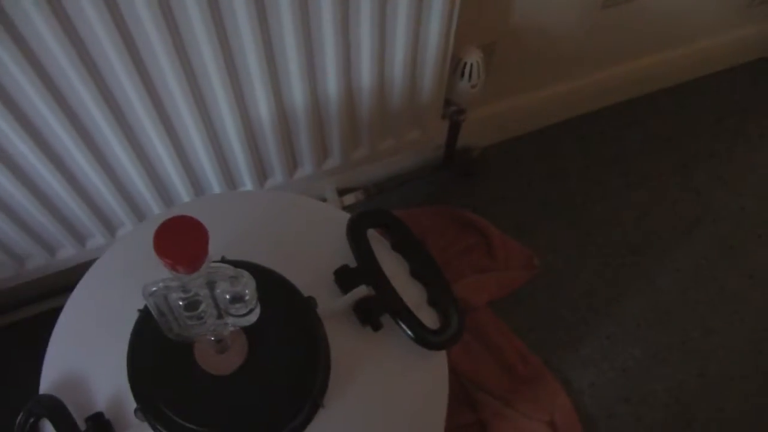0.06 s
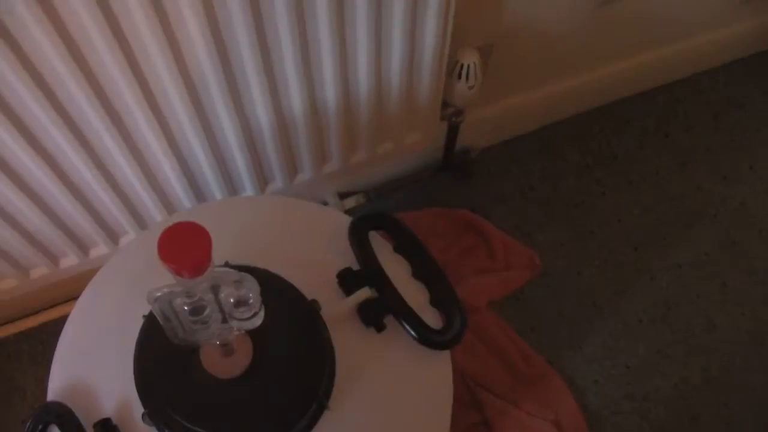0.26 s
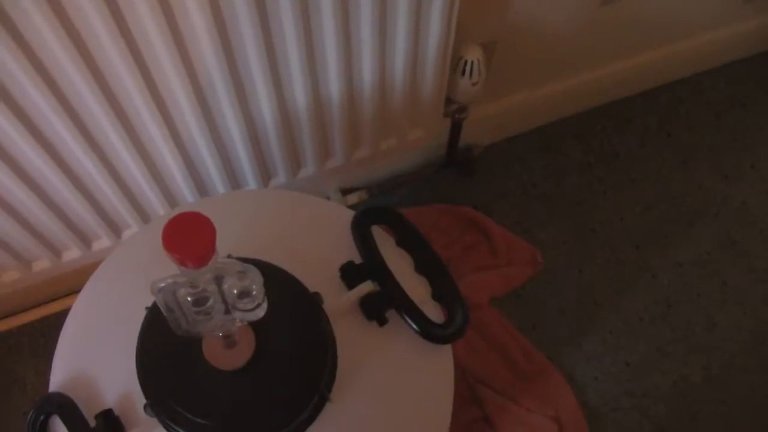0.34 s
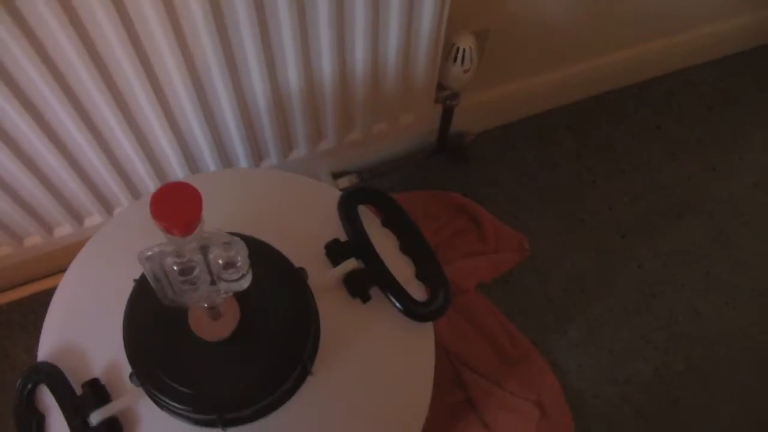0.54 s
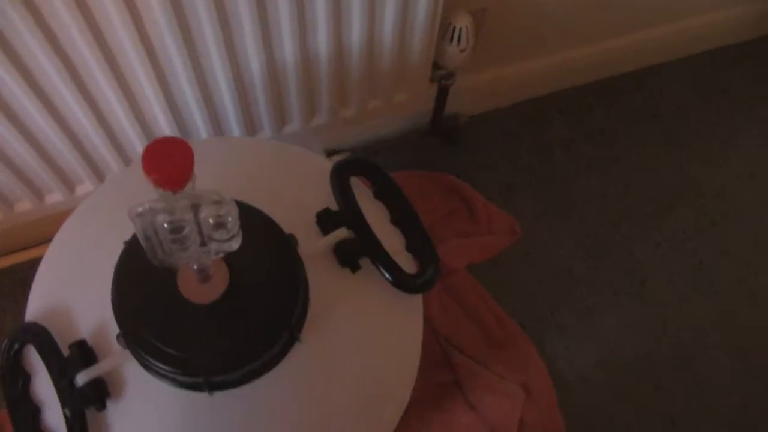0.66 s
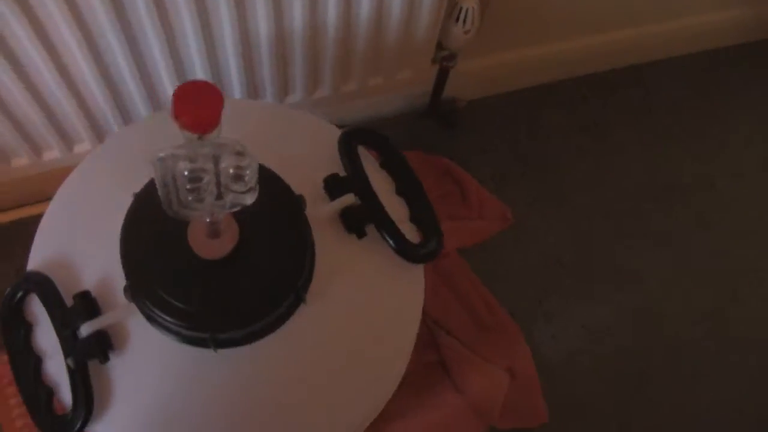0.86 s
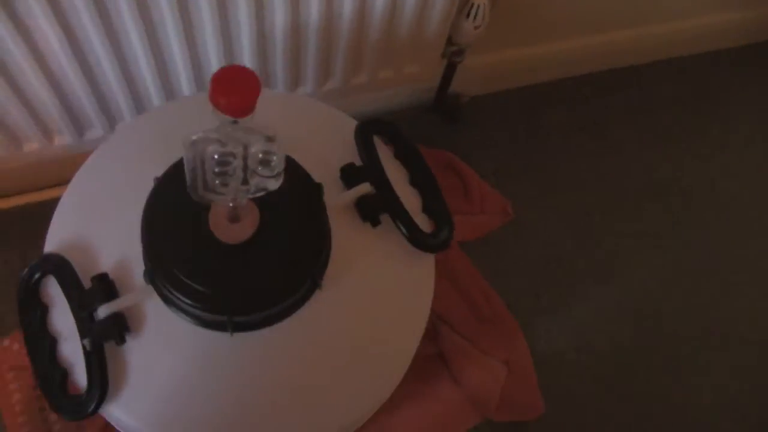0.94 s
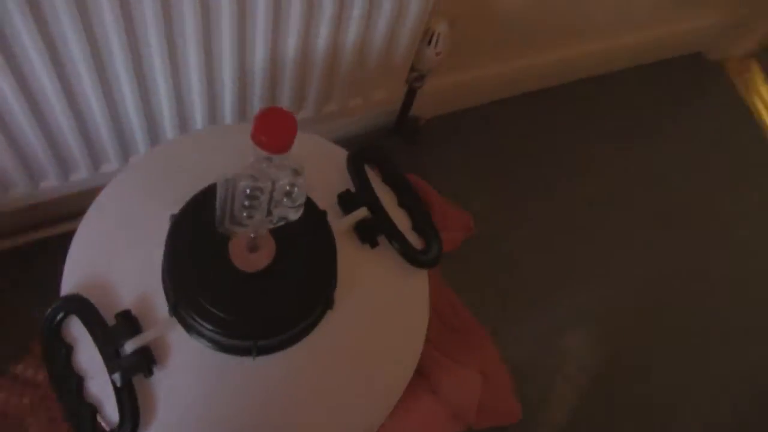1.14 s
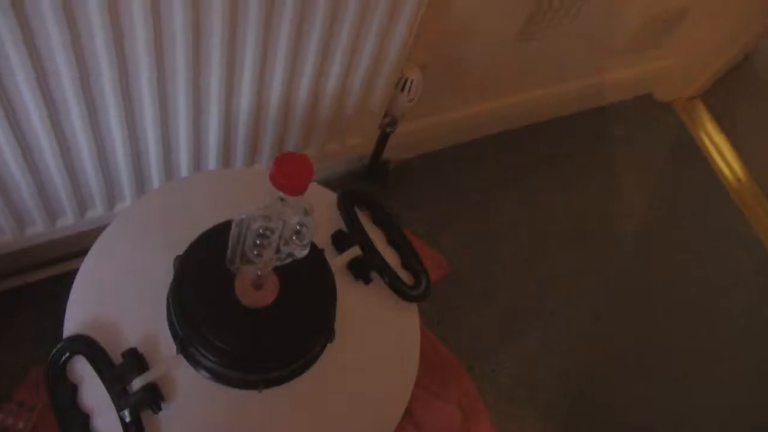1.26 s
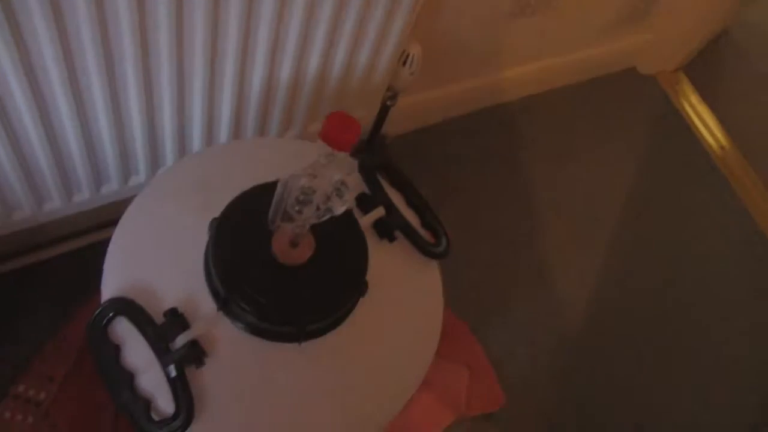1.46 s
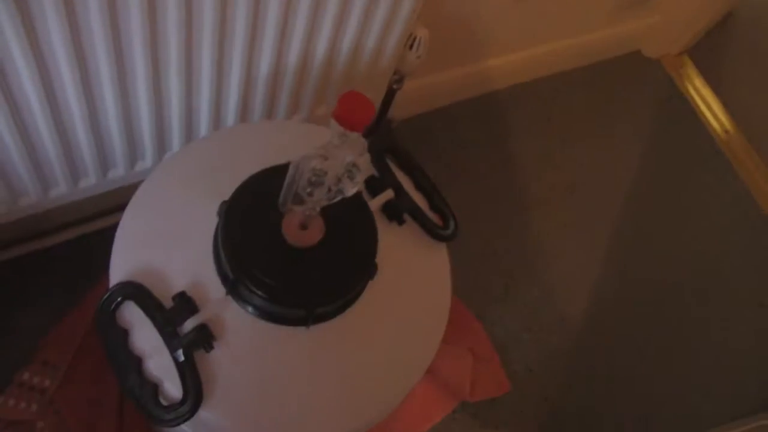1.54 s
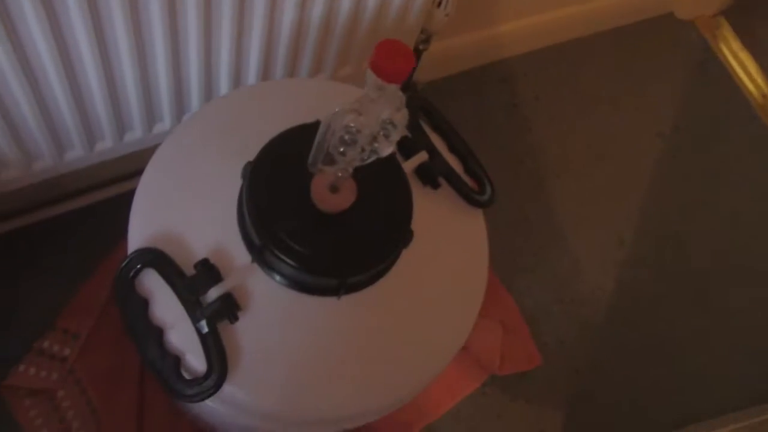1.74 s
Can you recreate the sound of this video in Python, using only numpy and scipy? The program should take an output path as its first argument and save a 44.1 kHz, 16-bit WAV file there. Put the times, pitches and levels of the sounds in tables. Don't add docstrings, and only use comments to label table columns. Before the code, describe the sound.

A water airlock on a plastic fermenting bucket gives a faint click and a loud sharp pop with a brief room echo, then quiet bubble ticks, gurgles and rustling, close to a hand-held microphone in a small carpeted room.

```python
import sys
import numpy as np
from scipy import signal
from scipy.io import wavfile
from scipy.ndimage import uniform_filter1d

SR = 44100
rng = np.random.default_rng(int(sys.argv[2]) if len(sys.argv) > 2 else 0)


def transcribe(u):
    v = np.clip(np.atleast_2d(u).T, -1, 1)
    q = np.round(v * 32767).astype(np.int16)
    wavfile.write(sys.argv[1], SR, q)


def boost_factor(decibels):
    exponent = np.asarray(decibels, float) / 20
    return 10 ** exponent


N = 81585

POP_LOW_CUT_HZ = 888


def rms_one(x):
    return x / np.sqrt(np.mean(x ** 2) + 1e-20)


def at_hz(points, hz):
    table_hz, values = np.transpose(points)
    return np.interp(np.log(hz), np.log(table_hz), values)


def cut(x, hz, kind):
    return signal.sosfilt(signal.butter(6, hz, kind, fs=SR, output="sos"), x)


def drift(rate_hz):
    every, settle = 40, 2000
    r = np.exp(-2 * np.pi * rate_hz * every / SR)
    white = rng.standard_normal(N // every + 2 + settle)
    slow = rms_one(signal.lfilter([1], [1, -2 * r, r * r], white)[settle:])
    return np.interp(np.arange(N) / every, np.arange(len(slow)), slow)


def burst(start_s, t60_s):
    t = np.arange(N) / SR - start_s
    return (t >= 0) * boost_factor(-60 * np.maximum(t, 0) / t60_s)


def ring(clicks, hz, t60_s):
    r = boost_factor(-60 / (t60_s * SR))
    w = 2 * np.pi * hz / SR
    return signal.lfilter([0, np.sin(w)], [1, -2 * r * np.cos(w), r * r], clicks + 1e-18)


def bands(white, gain, alike):
    out = 0
    edges = 24 * 2 ** np.arange(0, 10, .5)
    for k, (low, high) in enumerate(zip(edges, edges[1:])):
        band = signal.butter(2, [low, high], "band", fs=SR, output="sos")
        mid, side = signal.sosfilt(band, white[k % 2])
        hz = np.sqrt(low * high)
        c = np.clip(alike(hz), 0, 1)
        out = out + gain(hz) * (np.sqrt(1 + c) * mid + np.sqrt(1 - c) * side * [[1], [-1]])
    return out


def pop():
    # start in seconds, level of the hollow modes in dB, level of the bright modes in dB.
    contacts = [(0.1967, -39, -54), (0.2038, -36.5, -75), (.2282, -20.5, -33), (.2293, -16, -32.5),
                (.2298, -45, -19), (.2310, -46, -25.5), (.2320, -50, -22.5), (.2336, -23.5, -18),
                (.2345, -32, -25.5), (.2370, -20.5, -32), (.2402, -38, -30.5), (.2490, -26, -31),
                (.2535, -32, -44), (.2625, -36, -45), (.2670, -44, -50), (.2790, -43, -58),
                (.2960, -42, -54), (.3110, -39.5, -58)]
    # pitch in Hz, level in dB, 60 dB decay in seconds.
    hollow = [(824, -19, 0.032), (930, -5.5, 0.036), (950, -11, 0.074), (1025, -9.5, 0.075),
              (1146, -17.5, 0.048), (1463, -11.5, .04), (1784, -11, 0.019)]
    # pitch in Hz, level in dB, 60 dB decay in seconds.
    bright = [(2433, -9, 0.021), (2864, -13, 0.02), (3990, -12, 0.041), (4260, -11.5, .04),
              (4630, -3.5, 0.011), (4750, -8, 0.023), (5300, -2.5, 0.017), (6600, -10.5, 0.023),
              (7290, -7.5, 0.012), (8200, -18.5, 0.021), (9074, -5.5, 0.014), (9650, -7, 0.019),
              (12320, -14, 0.0093), (13350, -9.5, 0.0082)]
    spread_db, bright_vary_db = 2.5, 3.4
    crack_db, crack_t60_s = -3, 0.0048

    rows = np.array(contacts)
    at = (rows[:, 0] * SR).astype(int)
    out = np.zeros((2, N))
    chance = rng.standard_normal((len(contacts), len(hollow + bright), 3))
    for k, (hz, db, t60_s) in enumerate(hollow + bright):
        strength, sign, side = chance[:, k].T
        is_bright = k >= len(hollow)
        level_db = rows[:, 1 + is_bright] + db + bright_vary_db * is_bright * strength
        pan_db = (.3 + is_bright) * spread_db * side * [[.5], [-.5]]
        clicks = np.zeros((2, N))
        clicks[:, at] = boost_factor(level_db + pan_db) * (np.sign(sign) if is_bright else -1)
        out += ring(clicks, hz, t60_s)

    hiss = rng.standard_normal(N) + .25 * rng.standard_normal(N) * [[1], [-1]]
    crack = sum(boost_factor(db + crack_db) * burst(s, crack_t60_s) for s, _, db in contacts)
    out = out + signal.lfilter([.3], [1, -.7], hiss) * crack
    return cut(out, POP_LOW_CUT_HZ, "high")


def room_tail():
    # start in seconds, level in dB, tilt in dB per octave.
    echoes = [
        (.1965, -24, -2.5),
        (0.227, 6.5, -0.21),
    ]
    # frequency in Hz, level in dB per Hz.
    colour = [(88, -45), (150, -26.5), (636, -15.5), (941, -3), (1310, -8.5), (3690, -6.5), (4400, -4.5),
              (12100, -14.5), (16000, -26)]
    # frequency in Hz, 60 dB decay in seconds.
    decay = [(200, 0.27), (600, 0.25), (1500, 0.21), (3000, 0.19), (4600, 0.22), (7000, 0.18),
             (10000, 0.19), (15000, 0.13)]
    # centre in Hz, width in Hz, boost in dB.
    body = [(960, 240, 5), (2500, 370, -1.5), (3650, 290, -7), (4500, 450, 1.5), (5830, 450, -19)]
    level_db, alike, rise_s = -20.5, 0.94, 0.0018
    low_db, low_hz = 1, 537
    t = np.arange(N) / SR

    def gain(hz):
        swell = 0
        for s, db, tilt in echoes:
            rise = 1 - np.exp(-np.maximum(t - s, 0) / rise_s)
            swell = swell + boost_factor(db + tilt * np.log2(hz / 1000)) * burst(s, at_hz(decay, hz)) * rise
        return boost_factor(at_hz(colour, hz)) * swell

    tail = boost_factor(level_db) * bands(rng.standard_normal((2, 2, N)), gain, lambda hz: alike)
    for hz, width, db in body:
        b, a = signal.iirpeak(hz, hz / width, SR)
        tail = tail + (boost_factor(db) - 1) * signal.lfilter(b, a, tail)
    return cut(tail, POP_LOW_CUT_HZ, "high") + boost_factor(low_db) * cut(tail, low_hz, "low")


def ticks():
    # start in seconds, peak level in dB, pitch in Hz, ring in cycles.
    bubbles = [(.470, -52, 6800, 4), (0.554, -48.5, 385, 1.4), (0.783, -46, 1490, 5), (.783, -39, 2580, 7),
               (0.782, -44, 7460, 18), (0.783, -53, 14800, 30), (.8015, -51, 1490, 4),
               (0.8042, -39.5, 1800, 4), (0.816, -45, 1340, 6), (0.853, -37, 1620, 5.3),
               (0.851, -38, 3330, 7.7), (.852, -37, 6600, 14), (0.853, -43, 9930, 32),
               (0.908, -44, 6000, 5), (.963, -51, 3650, 46), (.976, -52, 2210, 61), (1.003, -43, 1860, 5.4),
               (1.004, -54, 11000, 15), (1.081, -52, 7000, 8), (1.234, -54, 8000, 10),
               (1.239, -49, 1220, 4), (1.2909, -38, 1340, 7.3), (1.287, -50, 2100, 6),
               (1.302, -44, 5970, 24), (1.305, -44, 1000, 3), (1.369, -43, 6000, 15), (1.296, -50, 493, 16),
               (1.292, -45, 870, 5.9), (1.334, -42, 905, 5.2), (1.367, -40, 830, 3.6),
               (1.335, -45, 1630, 11.4), (1.337, -41, 2580, 12.5), (1.368, -38.5, 1560, 5.3),
               (1.368, -46, 2220, 13), (1.419, -47.5, 3300, 13), (1.463, -45.5, 4000, 12),
               (1.464, -47, 2180, 11), (1.749, -46, 340, 4.5), (1.7616, -39, 1410, 5.5),
               (1.765, -48, 1164, 13), (1.764, -49, 3360, 14), (1.789, -48, 3480, 6), (1.744, -47, 1310, 4)]
    overtones = [2.1, 5.2]
    over_db, glide = -17.5, 0.029
    roughness = 0.55
    puff_db, puff_t60_s, puff_top = -10, 0.018, 1.5
    attack_s = 0.00074

    out = np.zeros(N)
    t = np.arange(4096) / SR
    chance = rng.standard_normal((len(bubbles), 2, len(t)))
    for (s, db, hz, cycles), (noise, rough) in zip(bubbles, chance):
        turns = hz * t * (1 + glide * hz * t / cycles)
        tone = np.sin(2 * np.pi * turns)
        tone = tone + boost_factor(over_db) * sum(np.sin(2 * np.pi * m * turns) for m in overtones if m * hz < SR / 4)
        smooth = uniform_filter1d(uniform_filter1d(rough, size=30), size=30)
        tone = tone * (1 + roughness * rms_one(smooth)) * np.exp(-3 * hz * t / cycles)

        edges = [0.44 * hz, min(puff_top * hz, 15000)]
        puff = rms_one(signal.sosfilt(signal.butter(2, edges, "band", fs=SR, output="sos"), noise))
        sound = tone + boost_factor(puff_db) * puff * boost_factor(-60 * t / puff_t60_s)
        sound = boost_factor(db) * sound * np.minimum(t / attack_s, 1)
        i = int(s * SR)
        out[i:i + len(t)] += sound[:N - i]
    return out


def rustle():
    # peak time in seconds, rise in seconds, fall in seconds, level in dB, tilt in dB per octave.
    swells = [(0.786, 0.022, 0.034, -60, -0.5), (.82, 0.025, 0.02, -62, -2),
              (0.859, 0.027, 0.026, -56.5, 0), (.975, 0.021, 0.027, -56.5, -0.5),
              (1.009, 0.008, 0.073, -62, -2), (1.145, 0.031, 0.054, -65.5, -1),
              (1.24, 0.032, 0.018, -65.5, 1.5), (1.30, 0.016, 0.026, -57.5, 0),
              (1.373, 0.028, 0.037, -58, -2.5), (1.414, 0.035, 0.021, -62, 0),
              (1.47, 0.015, 0.025, -62, -2), (1.60, 0.092, 0.11, -61.5, 1), (1.762, 0.034, 0.044, -62, -5),
              (1.81, 0.12, 0.12, -64.5, 0.5)]
    # frequency in Hz, level in dB per Hz.
    colour = [(150, -14), (500, -7), (1100, -2), (2500, -3.5), (4200, -6.5), (6400, -4.5), (9000, -11),
              (16000, -16)]
    grains_per_s, grain_spread_db = 5000, 1.5

    t = np.arange(N) / SR
    size = (2, 2, N)
    bells = [np.exp(-((t - s) / np.where(t < s, rise, fall)) ** 2) for s, rise, fall, _, _ in swells]
    hits = rng.random(size) < grains_per_s / SR
    strength = boost_factor(grain_spread_db * np.minimum(rng.exponential(1, size), 4))
    grains = hits * strength * rng.choice([-1, 1], size)

    def gain(hz):
        power = 0
        for bell, (*_, db, tilt) in zip(bells, swells):
            power = power + bell * boost_factor(2 * (db + tilt * np.log2(hz / 2500)))
        return boost_factor(at_hz(colour, hz) + 4.5 + 1.06 * drift(24)) * np.sqrt(power)

    white = rms_one(grains) + 0.75 * rng.standard_normal(size)
    return bands(white, gain, lambda hz: .95) * boost_factor(1.48 * drift(50))


def thuds():
    # start in seconds, peak level in dB, pitch in Hz.
    pushes = [
        (.245, -48, 74.4),
        (0.9914, -43, 114),
        (1.0150, -46.5, 207),
        (0.773, -57, 110),
        (1.215, -63, 150),
        (1.64, -53, 186),
        (1.819, -48.5, 73),
    ]
    length_cycles = 1.55
    t = np.arange(N) / SR
    out = 0
    for s, db, hz in pushes:
        turns = np.maximum(t - s, 0) * hz
        swell = turns * np.exp(1 - 4 * turns / length_cycles)
        out = out + boost_factor(db + 3.5) * np.sin(2 * np.pi * turns) * swell
    return out


def hum():
    hz, level_db, start_s, rise_s = 150, -68, 1.41, 0.024
    t = np.arange(N) / SR
    level = boost_factor(level_db + 1.3 * drift(7)) * np.clip((t - start_s) / rise_s, 0, 1)
    return level * np.sin(2 * np.pi * hz * t + 0.38 * drift(5.2))


def floor():
    # frequency in Hz, level in dB per Hz.
    colour = [(20, -4), (50, -5.5), (90, -6), (220, -6), (500, -9), (1000, -13.5), (6000, -22),
              (16000, -33)]
    # frequency in Hz, likeness from 0 to 1.
    likeness = [(30, 0.99), (60, 0.99), (180, 0.28), (550, 0.096), (1650, 0.56), (3500, 0.81),
                (15000, 0.75)]
    level_db = -63.5

    def gain(hz):
        return boost_factor(at_hz(colour, hz) + 1.3 * drift(5.8))

    sound = bands(rng.standard_normal((2, 2, N)), gain, lambda hz: at_hz(likeness, hz))
    return boost_factor(level_db) * rms_one(sound)


def scene():
    pop_pan_db = -.9
    side = boost_factor(np.array([[.5], [-.5]]) * pop_pan_db)
    return (pop() + room_tail()) * side + ticks() + rustle() + thuds() + hum() + floor()


def low_pass(x):
    return signal.sosfilt(signal.butter(12, 16120, fs=SR, output="sos"), x)


def record(dry):
    top_hz, offset_db = 15900, -53.2
    heard = signal.sosfilt(signal.cheby2(24, 80, top_hz, fs=SR, output="sos"), dry)
    mix = heard + boost_factor(offset_db)
    return low_pass(mix)


dry = scene()
out = record(dry)
transcribe(out)
```